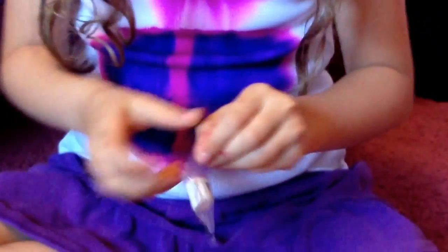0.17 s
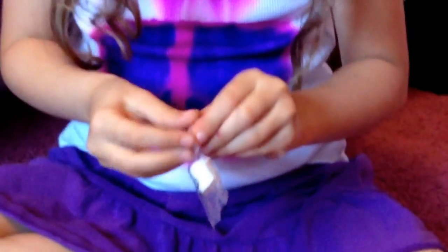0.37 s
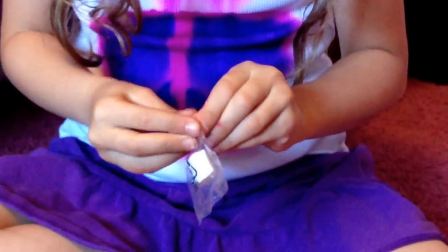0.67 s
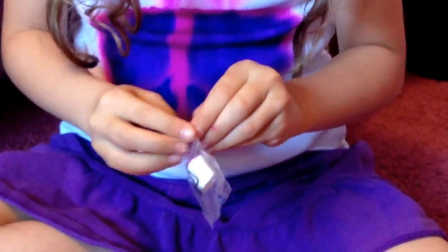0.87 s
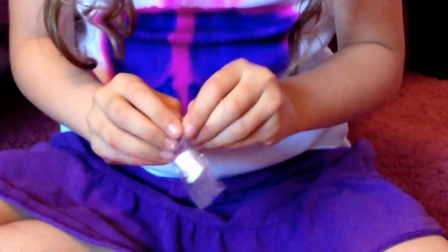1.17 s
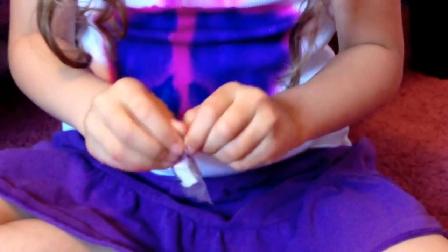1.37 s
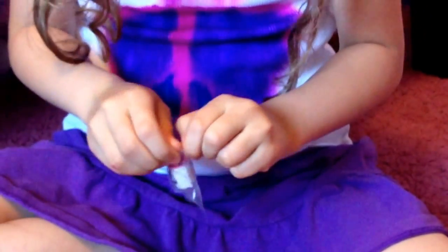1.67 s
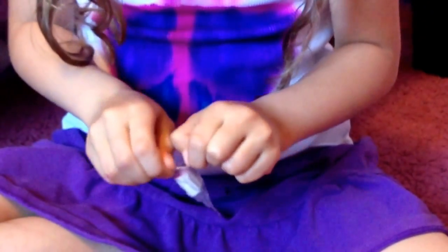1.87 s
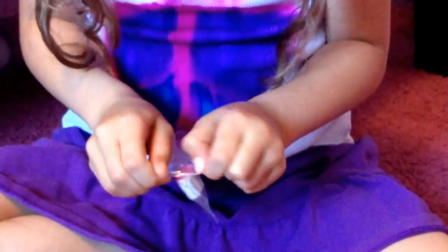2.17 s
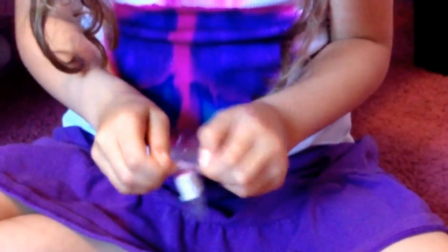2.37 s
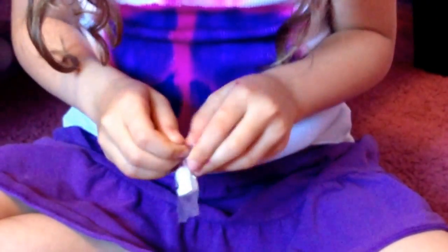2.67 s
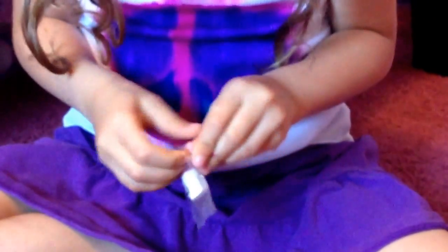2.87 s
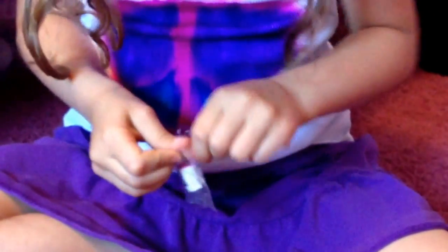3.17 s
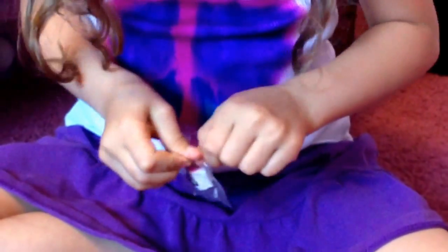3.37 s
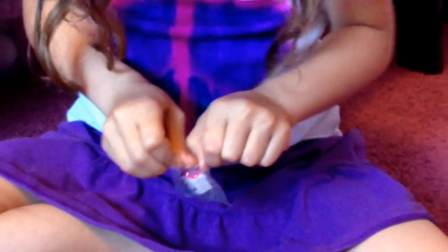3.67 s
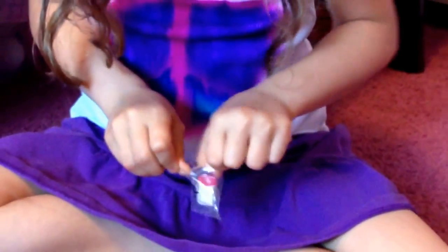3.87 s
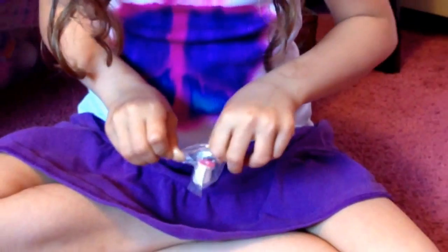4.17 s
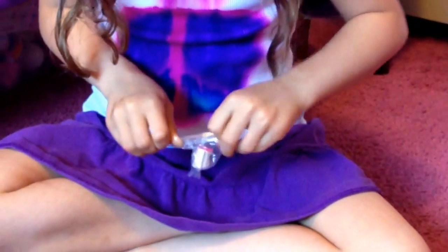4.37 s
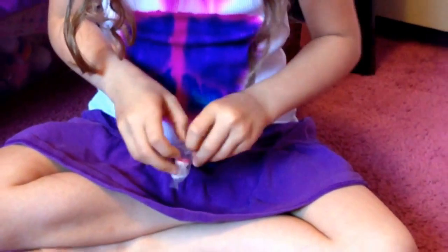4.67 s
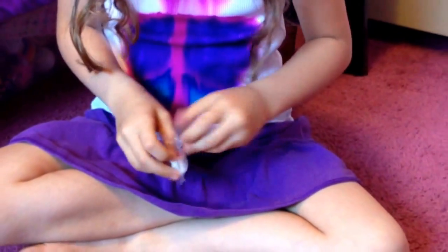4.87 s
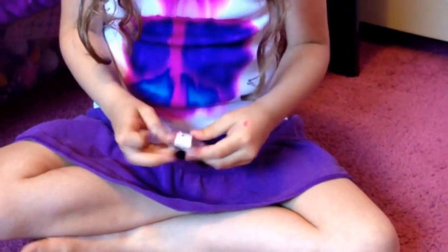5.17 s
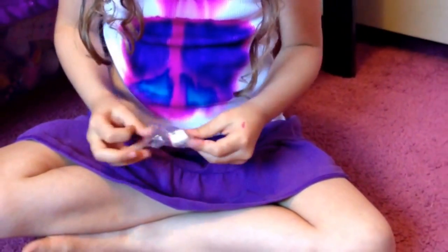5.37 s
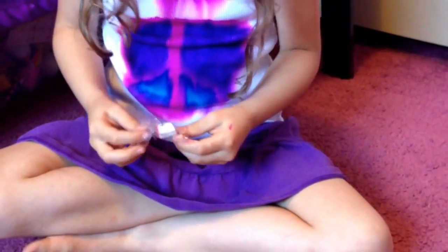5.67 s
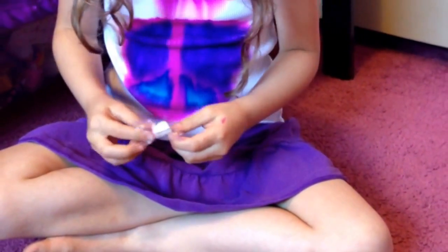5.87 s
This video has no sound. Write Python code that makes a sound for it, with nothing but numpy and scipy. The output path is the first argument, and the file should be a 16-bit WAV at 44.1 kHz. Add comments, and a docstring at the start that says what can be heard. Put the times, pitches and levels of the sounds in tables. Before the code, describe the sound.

Crisp, bright plastic film crinkling heard close in a quiet, carpeted indoor space. Separate clicks and short rustling tugs come with pauses between them, then a hard burst of snapping and crackling in the middle as the packet is pulled, followed by smaller fiddling rustles. Soft dull thuds of fingers and the little toy inside; a steady low hum beneath, barely audible, slowly weakening.

```python
"""A small clear plastic packet is picked at and pulled open by fingers, close by, in a carpeted room.
Its stiff film buckles in sharp snaps: noise jolts shaped by the ringing modes of the facet that flips.
Sliding film rustles as many tiny creases and filtered noise under uneven strokes; small random ticks grow
louder and softer with them. Dull bumps come from fingers and the toy inside.
A low sine hum near 97 Hz, slowly changing in level, and softly hissing filtered noise lie underneath."""
import sys
import numpy as np
from scipy import signal
from scipy.fft import rfft, irfft, next_fast_len
from scipy.io import wavfile
from scipy.ndimage import uniform_filter1d, map_coordinates

SR = 44100
rng = np.random.default_rng(int(sys.argv[2]) if len(sys.argv) > 2 else 0)


def digitize_waveform(pressure):
    """Quantize a signal to 16-bit integers and store it at the path in sys.argv[1].

    Rows of a 2-D input are taken as channels; values are limited to [-1, 1].
    """
    field = np.atleast_2d(pressure).T
    bounded = np.clip(field, -1, 1)
    quanta = np.round(bounded * 32767).astype(np.int16)
    wavfile.write(sys.argv[1], SR, quanta)


N = 264952  # length in samples
TOP_HZ = 15500  # upper band limit


def amp(db):
    """Amplitude ratio: 20 dB make a factor of ten."""
    return 10 ** (np.asarray(db) / 20)


def unit(x):
    """Normalisation: scale a signal to rms 1."""
    return x / np.sqrt(np.mean(x ** 2) + 1e-20)


def along(points, hz):
    """Spectral envelope: (Hz, value) points interpolated on a logarithmic frequency axis."""
    point_hz, values = np.transpose(points)
    return np.interp(np.log(hz + 1), np.log(point_hz + 1), values)


def curves(rows):
    """Slow variation: each column after the time, interpolated to one value per sample."""
    seconds, *columns = np.transpose(rows)
    t = np.arange(N) / SR
    return [np.interp(t, seconds, column) for column in columns]


def filtered(x, response):
    """Linear filtering: the spectrum of x times a function of frequency."""
    size = next_fast_len(N + 8192)
    hz = np.fft.rfftfreq(size, 1 / SR)
    return irfft(rfft(x, size) * response(hz), size)[:N]


def causal(gain):
    """Minimum phase: folding the cepstrum gives a response of this gain that rings only after it is struck."""
    cepstrum = irfft(np.log(np.maximum(gain, 1e-6)))
    half = len(cepstrum) // 2
    cepstrum[1:half] *= 2
    cepstrum[half + 1:] = 0
    return np.exp(rfft(cepstrum))


def add(track, s, sound):
    """Superposition: mix a sound into the track at time s in seconds."""
    start = max(0, round(s * SR))
    track[start:start + len(sound)] += sound[:max(0, N - start)]


def snap(pitch_hz, below, above, flip_t60=0.001, flutter_db=-8, flutter_t60=0.019, ring_db=-5, ring_q=12, size=2048):
    """Snap-through buckling: one facet flips, flutters through the sheet and rings in its modes; energy 1."""
    # What the packet radiates. Each point: frequency in Hz, gain in dB.
    film_gain = [(100, -22), (250, -24), (390, -10), (570, -14), (760, 2), (1100, 1.5), (1550, -0.5),
                 (1950, 3), (4000, 3.5), (5000, 0.5), (6500, 1), (15000, -2.5)]
    t = np.arange(size) / SR
    hz = np.fft.rfftfreq(size, 1 / SR) + 1
    flip = rfft(rng.standard_normal(size) * amp(-60 * t / flip_t60))
    flutter = rfft(rng.standard_normal(size) * amp(flutter_db - 60 * t / flutter_t60))
    # the flutter carries less treble than the flip itself
    jolt = flip + flutter / (1 + 1j * hz / 6000)
    # even out the noise burst's broad spectrum, so that the colour is set below
    broad_power = uniform_filter1d(np.abs(jolt) ** 2, size=40)
    jolt *= causal(np.abs(broad_power) ** -.5)

    # below and above are slopes in dB per octave on either side of the facet's pitch:
    # a facet radiates poorly below it, and a soft crease loses the treble
    octaves = np.log2(hz / pitch_hz)
    slopes = below * np.minimum(octaves, 0) - above * np.maximum(octaves, 0)
    colour = amp(along(film_gain, hz) + slopes)
    # three damped modes cluster around the pitch
    modes_hz = pitch_hz * np.exp(rng.normal(0, 0.1, size=(3, 1)))
    detuning = hz / modes_hz - modes_hz / hz
    ring = 1 + amp(ring_db) * np.sum(1 / (1 + (ring_q * detuning) ** 2), axis=0)
    band = amp(-60 * np.clip((hz - TOP_HZ) / 2000, 0, 1))
    return unit(irfft(jolt * causal(colour * ring * band))) * np.sqrt(SR / size)


def buckling():
    """Elastic instability: facets of the film snap over, duller the gentler they are, each with a short echo."""
    # Facets that buckle loudly enough to stand out. Each row: start in seconds, energy in dB before the echo,
    # facet pitch in Hz, fall below the pitch in dB per octave.
    snaps = [(0.036, -74.5, 5000, 3), (0.0576, -69.5, 4000, 11), (0.0618, -67, 4800, 2),
             (0.077, -73, 5290, -1), (0.097, -70.5, 8030, 1.5), (0.1168, -78, 3050, -2.5),
             (0.2039, -72.5, 3770, 3), (0.2302, -68.5, 12180, 0), (0.2599, -61.5, 11100, 5.5),
             (0.3508, -85, 2900, 10), (0.4181, -85, 2920, -1), (0.8627, -79.5, 5400, -2),
             (0.9258, -86.5, 2000, 5), (0.9898, -80, 6990, 2.5), (1.081, -58, 14700, 5.5),
             (1.1468, -84, 10000, 1), (1.174, -77, 5290, -1.5), (1.189, -71.5, 9100, 4.5),
             (1.303, -76, 3000, 0.5), (1.3974, -83.5, 1900, 4), (1.485, -68, 1950, 4.5),
             (1.5812, -58, 8900, 2), (1.585, -66, 2330, 15), (1.5967, -71, 5200, 1), (1.6088, -61, 6100, 7),
             (1.6276, -70.5, 3700, 1), (1.6714, -75.5, 2300, 11), (1.7309, -80, 6400, 5.5),
             (1.7866, -56, 4500, 9), (1.8217, -65, 5200, 12), (1.913, -77, 2640, -4.5),
             (2.1847, -75, 3490, -1), (2.2311, -55, 3800, 11.5), (2.5123, -67.5, 6080, 2.5),
             (2.535, -70.5, 3260, 2), (2.5643, -66.5, 9000, 3.5), (2.6725, -68.5, 5670, 3.5),
             (2.7533, -55.5, 13400, 7.5), (2.9406, -60.5, 5700, 3.5), (3.0027, -80.5, 4590, 2),
             (3.233, -84.5, 4440, 0.5), (3.3073, -81, 6000, 1), (3.4334, -61.5, 14700, 1),
             (3.4378, -66, 9000, -1.5), (3.4448, -58, 7000, 4), (3.449, -53.5, 6700, 1),
             (3.4687, -68, 7000, 14), (3.5947, -73, 3300, 5.5), (3.6035, -57, 12000, 1),
             (3.6731, -64.5, 8800, 4), (3.7233, -57.5, 6900, -0.5), (3.7931, -62.5, 5290, -1),
             (3.8395, -61.5, 5200, 1), (3.8467, -56.5, 5900, -1.5), (3.859, -58.5, 13000, 0.5),
             (3.8823, -61, 15000, 0.5), (3.9992, -80, 4630, -4.5), (4.0206, -64.5, 12800, 4),
             (4.0788, -52.5, 1760, 0.5), (4.0851, -48, 3900, 0.5), (4.1009, -59, 3000, 8),
             (4.1099, -56, 15000, 4), (4.151, -67.5, 2460, 5), (4.1666, -63, 13000, 2.5),
             (4.1818, -67, 3100, 7.5), (4.2484, -68.5, 3420, 5.5), (4.2757, -71, 1430, 1),
             (4.3213, -64, 3660, 2.5), (4.5206, -78, 9230, 1.5), (4.5364, -74, 11000, 3),
             (4.5527, -73, 2650, 4), (4.6058, -72.5, 12000, 14), (4.6776, -67, 7010, 1),
             (4.6937, -70, 8700, 2.5), (4.7523, -68, 6000, 0.5), (4.7758, -75, 4590, -1.5),
             (4.8908, -68.5, 7490, 2), (5.3619, -64.5, 12000, 0.5), (5.3814, -59, 10600, 3),
             (5.5247, -81, 9470, 0), (5.569, -72.5, 5500, -2), (5.5926, -66.5, 2870, 5.5),
             (5.7731, -73, 2020, 8.5), (5.908, -71.5, 13000, 8)]
    # a firm snap's energy in dB, its treble loss above the pitch in dB per octave, added loss per dB gentler
    firm_db, firm_fall, dulling_per_db = -65.5, 4, 0.22
    track = np.zeros(N)
    for s, db, pitch_hz, below in snaps:
        above = max(0, firm_fall + dulling_per_db * (firm_db - db))
        add(track, s, amp(db) * room(snap(pitch_hz, below, above), wet_db=-10.5))
    return track


def bumps():
    """Soft impact: fingers and the toy inside excite low, barely ringing modes, each with a short echo."""
    # Dull bumps. Each row: start in seconds, energy in dB before the echo.
    knocks = [(0.006, -78), (0.03, -83), (0.107, -81), (1.213, -84), (1.317, -82), (1.916, -81.5),
              (2.234, -75.5), (2.324, -89), (2.417, -85), (3.026, -84.5), (3.437, -68), (3.697, -81.5),
              (3.888, -70.5), (4.453, -86), (4.908, -77.5), (5.942, -84)]
    track = np.zeros(N)
    for s, db in knocks:
        bump = snap(pitch_hz=835, below=-1, above=7.4, ring_db=-25)
        add(track, s, amp(db) * room(bump, wet_db=-11))
    return track


def effort():
    """Stick-slip friction: a gain per sample in which each stroke rises, holds unevenly and fades."""
    # Strokes that slide and bend the film. Each row: time of full rise in seconds,
    # length until release in seconds, nominal level in dB.
    strokes = [(0.0, 0.058, -55.5), (0.63, 0.2, -76), (1.195, 0.046, -66), (1.577, 0.066, -62),
               (2.171, 0.04, -69), (2.493, 0.083, -60.5), (3.435, 0.041, -55.5), (3.5, 0.36, -73.5),
               (3.849, 0.046, -46), (4.081, 0.025, -51.5), (4.157, 0.041, -58), (4.538, 0.13, -63.5),
               (4.746, 0.074, -56.5), (4.823, 0.045, -64), (4.89, 0.02, -53), (5.118, 0.16, -68),
               (5.312, 0.086, -60.5), (5.456, 0.087, -71), (5.576, 0.027, -59.5), (5.689, 0.13, -68),
               (5.952, 0.08, -62)]
    attack_s, release_s = 0.019, 0.025
    held_db = -83.5  # between strokes the held film barely stirs
    catches_per_s, catch_db = 90, 2.5  # rate and spread of catching and slipping under the fingertips
    t = np.arange(N) / SR
    gain = np.full(N, amp(held_db))
    for s, length, db in strokes:
        rise = np.clip(1 + (t - s) / attack_s, 0, 1)
        fade = np.clip(1 - (t - s - length) / release_s, 0, 1)
        gain = np.maximum(gain, amp(db) * (rise * fade) ** 2)
    catching = map_coordinates(rng.standard_normal(N), [t * catches_per_s])
    return gain * unit(amp(catch_db * catching))


def rustle(gain, creases_per_s=520, spread_db=6.5, rub_db=-8, count=24):
    """Crackling noise: sliding film sums many tiny creases, a few much larger than the rest, and a soft rub."""
    # Spectrum of film rubbing on fingertips. Each point: frequency in Hz, relative density in dB per Hz.
    rub_density = [(150, -17), (350, 10), (560, 10), (780, 14), (1400, -17), (2800, 9.5), (6000, -6),
                   (11000, 3.5), (15000, 3)]
    creases = np.zeros(N)
    for pitch_hz in np.geomspace(800, 13000, num=count):
        times = rng.integers(N, size=round(creases_per_s * N / SR / count))
        sizes = amp(spread_db * np.minimum(rng.exponential(size=len(times)), 2))
        # the stiff little folds snap hardest
        crease = snap(pitch_hz, below=7.2, above=10.0) * np.sqrt(pitch_hz)
        creases += signal.oaconvolve(np.bincount(times, sizes, N), crease)[:N]
    rub = unit(filtered(rng.standard_normal(N), lambda hz: amp(along(rub_density, hz))))
    return room((unit(creases) + amp(rub_db) * rub) * gain, wet_db=-11.0)[:N]


def ticks(gain):
    """Random point process: small facets flip at chance moments, as loudly as the fingers press."""
    ticks_per_s, tick_db, spread_db = 40, -26.5, 4  # energy in dB against the stroke gain, scatter either way
    low_hz, high_hz = 2220, 12000
    track = np.zeros(N)
    for when, pitch, strength in rng.random((round(ticks_per_s * N / SR), 3)):
        pitch_hz = low_hz * (high_hz / low_hz) ** pitch
        db = tick_db + spread_db * (2 * strength - 1)
        tick = snap(pitch_hz, below=2.5, above=11)
        add(track, when * N / SR, gain[int(when * N)] * amp(db) * tick)
    return room(track, wet_db=-11)[:N]


def room(x, wet_db, delay=0.0014, dull_hz=9000, size=8192):
    """Diffuse reverberation: decaying noise answers from the walls; carpet and cloth soak up its treble."""
    # The room's decay. Each point: frequency in Hz, time to fall by 60 dB in seconds.
    decay_t60 = [(300, 0.096), (3000, 0.15), (8000, 0.14), (15000, 0.14)]
    hz, t, noise = signal.stft(rng.standard_normal(size), SR, nperseg=256)
    decay = amp(-60 * t / along(decay_t60, hz)[:, None])
    absorption = np.hypot(1, hz / dull_hz)[:, None]
    tail = signal.istft(noise * decay / absorption, SR, nperseg=256)[1]
    tail = tail * (1 - np.exp(-(np.arange(size) / SR / delay) ** 2))  # the answer builds up gradually
    answer = amp(wet_db) * tail / np.linalg.norm(tail)
    answer[0] += 1  # the direct sound
    return signal.fftconvolve(x, answer)


def background():
    """Tones in broadband noise: a low hum slowly changing in level and a faint mains line over rumble and hiss."""
    # The low hum near 97 Hz. Each row: time in seconds, frequency in Hz, rms level in dB.
    hum_course = [(0.0, 96.54, -59), (4.52, 97.68, -65), (5.86, 96.3, -71), (6.01, 102.7, -66)]
    # Spectrum of the room's air. Each point: frequency in Hz, relative density in dB per Hz.
    air_density = [(20, -28.5), (42, -3.5), (58, 2.5), (70, 4), (82, -1), (110, 4), (155, 2.5), (195, -9),
                   (400, -13.5), (900, -21), (2000, -25), (6000, -29), (15000, -33)]
    hum_hz, hum_db = curves(hum_course)
    hum_phase = 2 * np.pi * np.cumsum(hum_hz) / SR
    hum = np.sqrt(2) * amp(hum_db) * np.sin(hum_phase)
    mains = amp(-75.0) * np.sin(2 * np.pi * 59 * np.arange(N) / SR)
    air = unit(filtered(rng.standard_normal(N), lambda hz: amp(along(air_density, hz))))
    return hum + mains + amp(-66) * air


def scene():
    """Superposition: the packet's sounds and the quiet room add up in one channel."""
    gain = effort()
    packet = buckling() + bumps() + rustle(gain) + ticks(gain)
    return (packet + background())[None]


def record(dry):
    """Band limitation: a very steep low-pass keeps next to nothing above the limit."""
    def low_pass(hz):
        return 1 / np.sqrt(1 + (hz / TOP_HZ) ** 160)
    return np.array([filtered(channel, low_pass) for channel in dry])


dry = scene()
out = record(dry)
digitize_waveform(out)
```